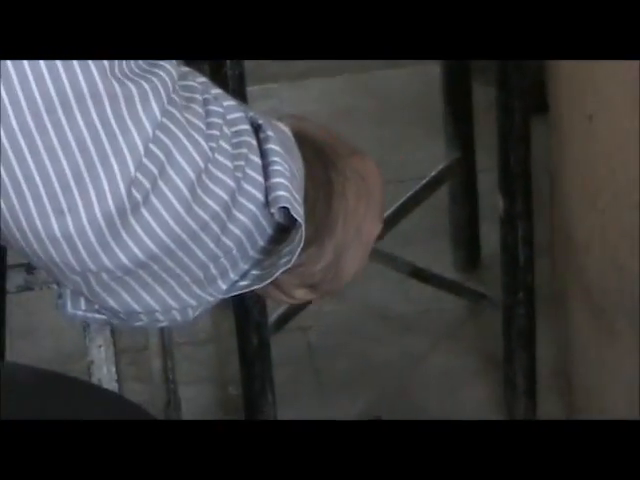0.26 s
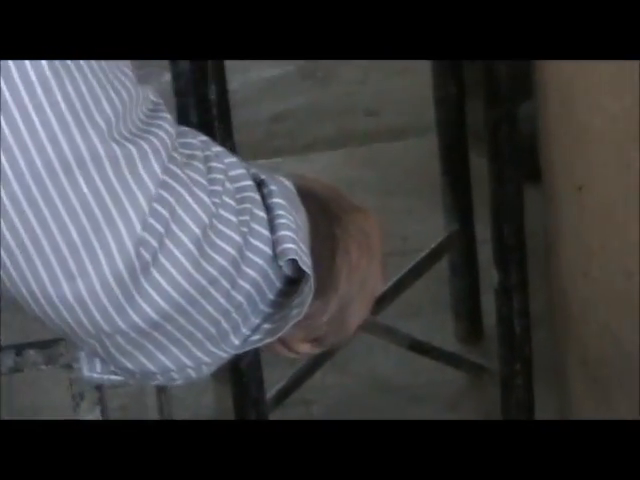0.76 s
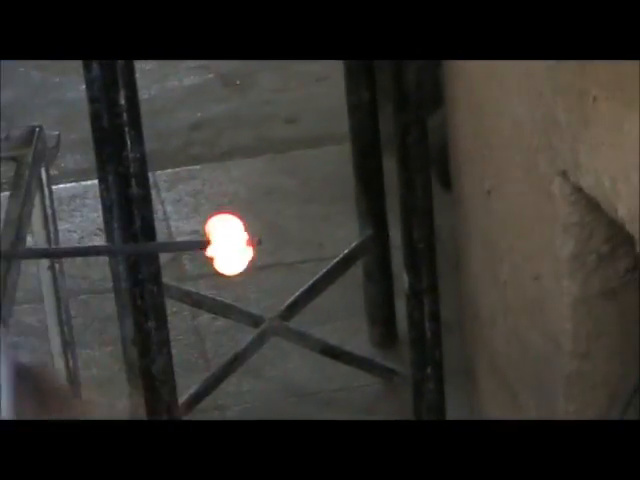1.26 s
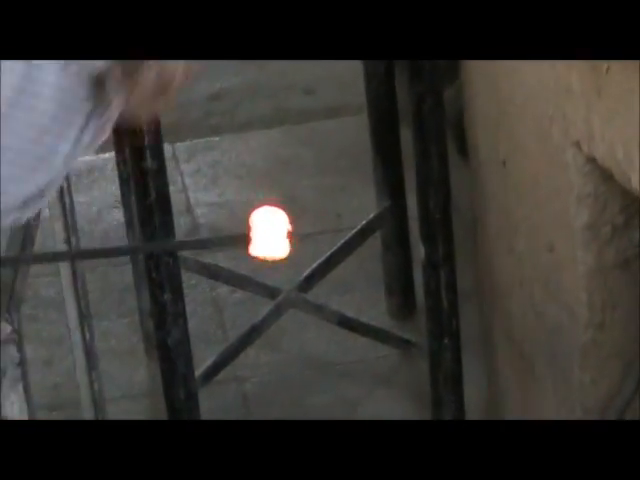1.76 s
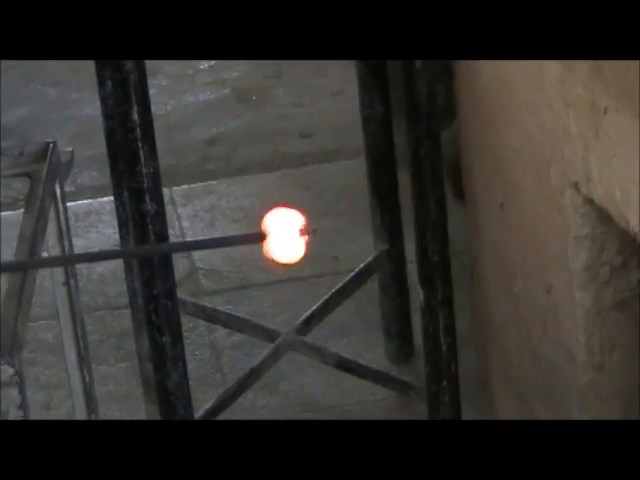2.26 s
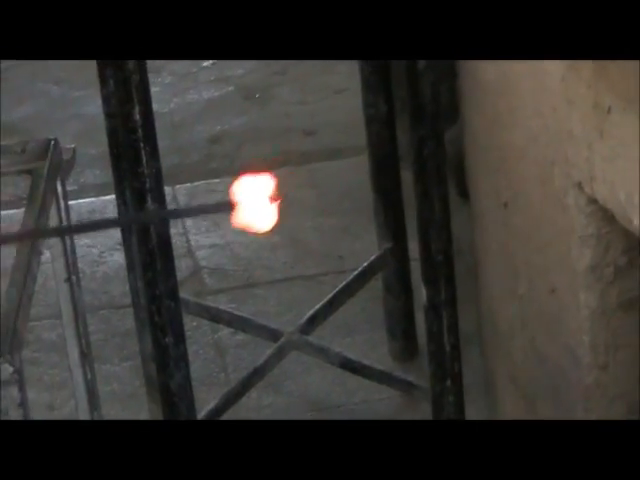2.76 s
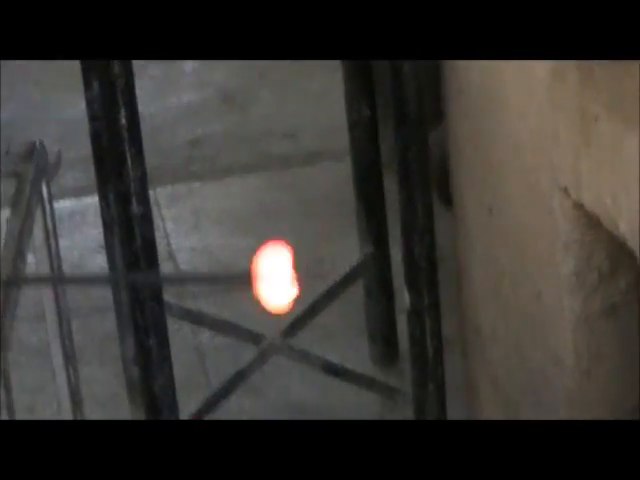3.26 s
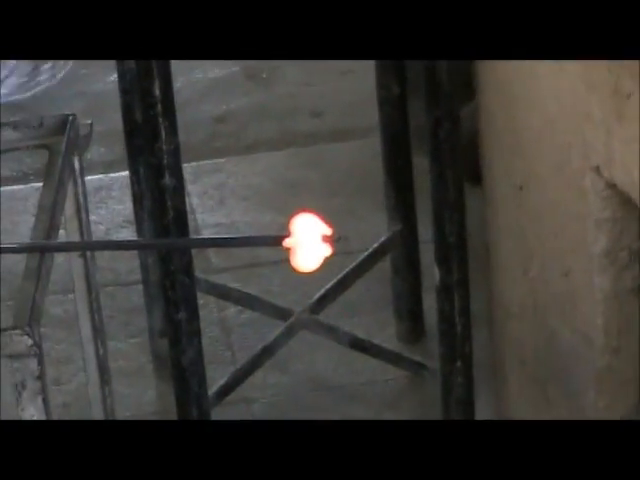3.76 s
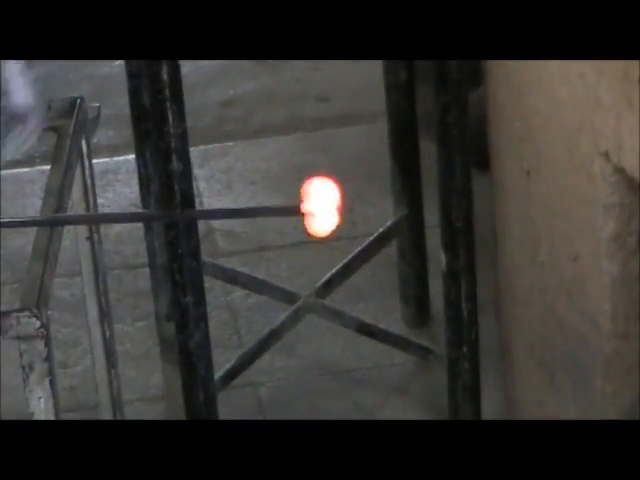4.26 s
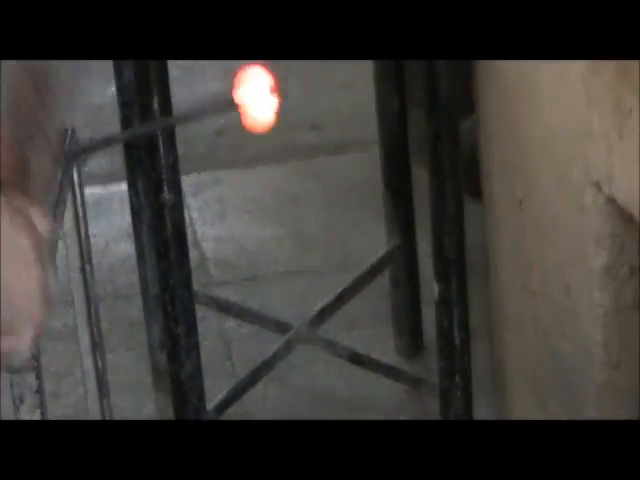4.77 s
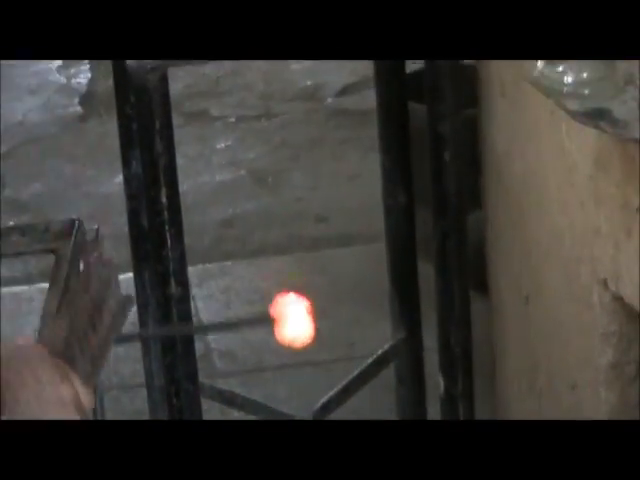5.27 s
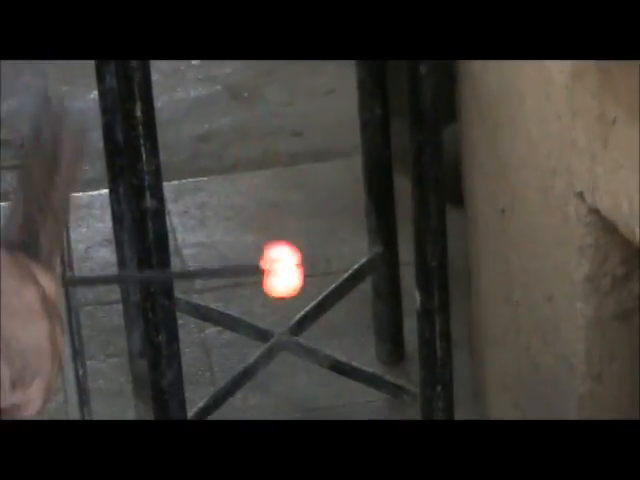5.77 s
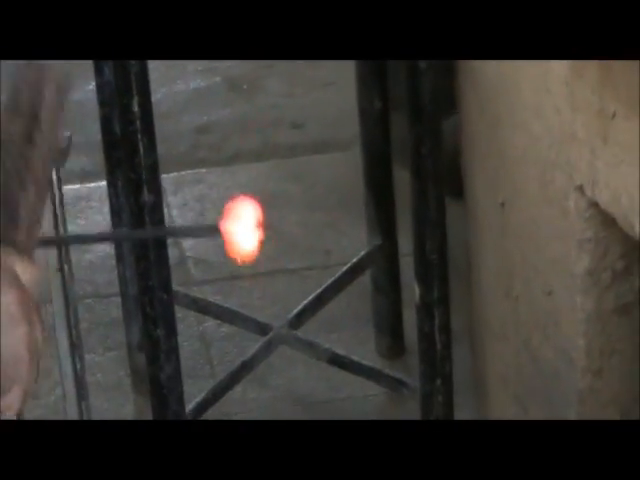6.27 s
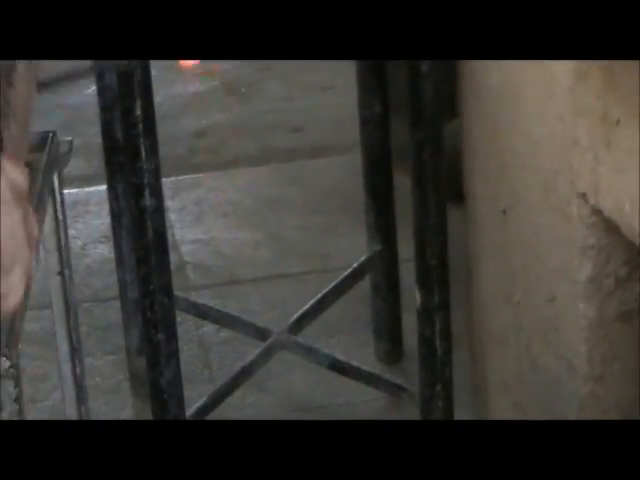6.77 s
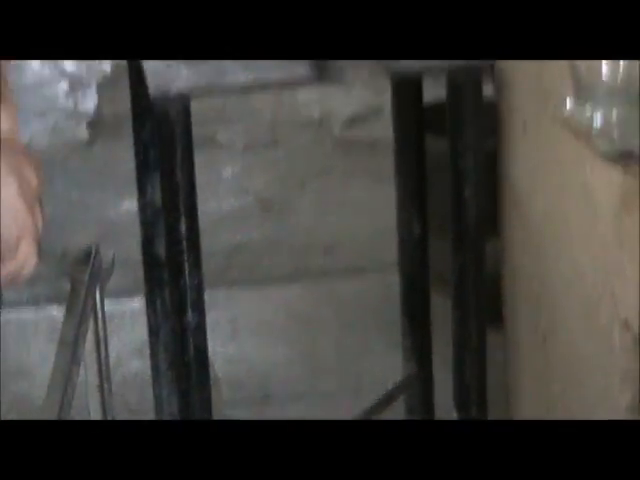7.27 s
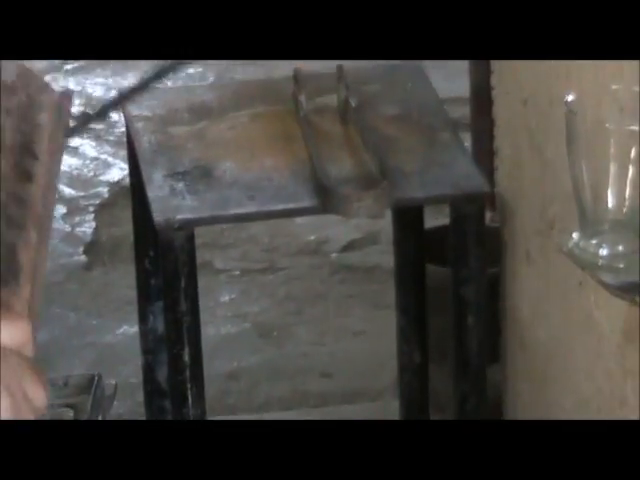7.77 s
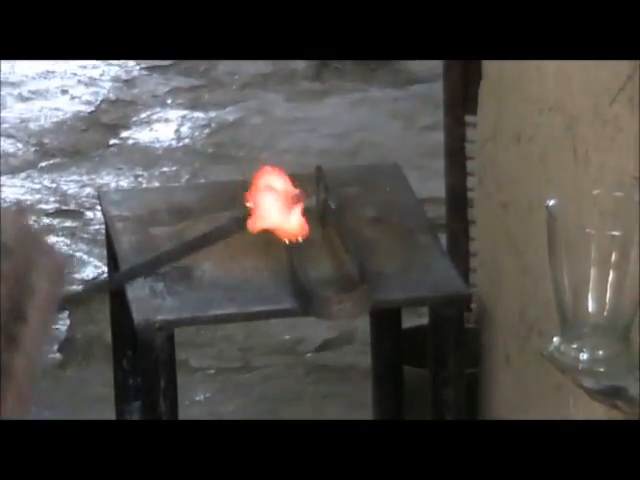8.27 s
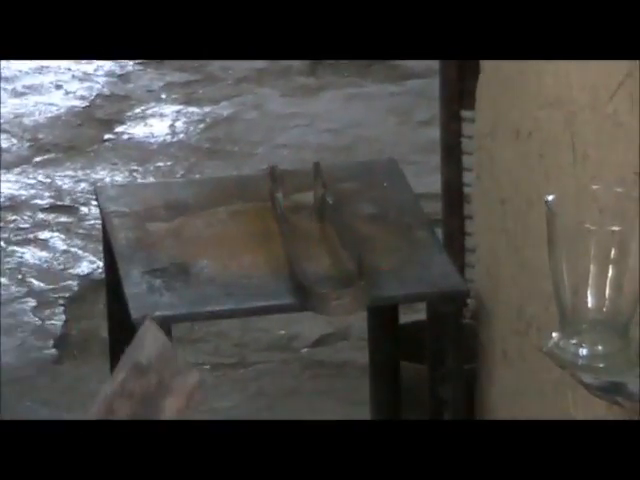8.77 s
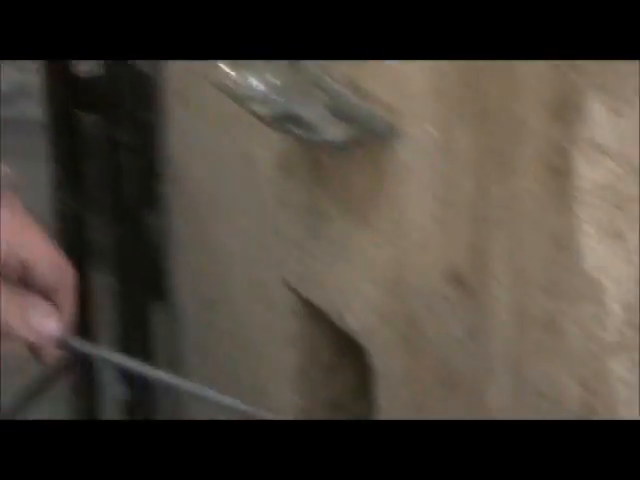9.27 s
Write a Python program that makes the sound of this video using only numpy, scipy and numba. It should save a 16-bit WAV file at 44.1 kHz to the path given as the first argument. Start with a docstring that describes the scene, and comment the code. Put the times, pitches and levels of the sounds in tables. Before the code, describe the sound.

In a hard-walled glass workshop a furnace roars low and steady, with draught puffs thumping the microphone. Far tools clank down at about two and three seconds, shaking an iron bar and a tray. After two faint steel brushes, a nearby steel tool is tapped about five times a second until the later part, clacking and ringing brightly, some early taps followed by grainy skitters. The roar dips under the taps, then returns.

```python
"""A steel tool is tapped close to the microphones in a quick run: clack, shimmer and ringing steel modes.
After some taps it skitters in many tiny contacts; before the run the steel is lightly brushed twice.
Across the hard-walled workshop, tools clank down and shake a tray and an iron bar.
A glass furnace roars throughout, as noise shaped by cavity resonances, and draught puffs buffet the ports.
The recorder's limiter ducks everything after loud peaks, so the roar dips under the taps."""
import sys
import numpy as np
from scipy import signal
from scipy.fft import rfft, irfft, next_fast_len
from scipy.io import wavfile
from numba import njit

SR = 44100
rng = np.random.default_rng(int(sys.argv[2]) if len(sys.argv) > 2 else 0)


def unload_audio(sound):
    """Save the sound as a 16-bit wav file, at the path given as the first command line argument."""
    columns = np.transpose(np.atleast_2d(sound))
    # keep every value between -1 and 1, then stretch to whole-number steps
    steps = np.round(np.clip(columns, -1, 1) * 32767)
    wavfile.write(sys.argv[1], SR, steps.astype(np.int16))


N = 419821
TIME = np.arange(N) / SR
AFTER = np.arange(int(.6 * SR)) / SR  # seconds since a blow

# Draught puffs across the microphone: peak_s, relative level_db, length_s shared by rise and fall
DRAUGHT_PUFFS = [(0.617, -15, 0.089), (0.884, -18.5, 0.45), (2.847, -26, 0.063), (3.138, -10.5, 0.29),
                 (3.528, -14, 0.17), (3.723, -18, 0.09), (4.514, -27, 0.14), (6.625, -10.5, 0.1),
                 (7.942, -6.5, 0.026), (8.246, -25.5, 0.97), (8.636, -13, 0.19), (9.255, -7, 0.075),
                 (9.365, -10, 0.1)]
# Tone of the buffeting at the two ports: pitch_hz, relative level_db
PORT_BUFFETING = [(20, -12.5), (40, -5), (70, 0), (120, 7), (180, 3), (300, 0), (450, -12.5), (700, -21),
                  (1200, -41), (3000, -77)]
# Slow drift of the flame's strength: time_s, relative level_db
FLAME_DRIFT = [(0, 2.5), (1.5, 4), (3.3, 2.5), (4.6, 2), (6.2, 3.5), (7.2, 8.5), (8.3, 2.5), (9.52, 10.5)]
# Resonances of furnace and room: pitch_hz, relative width_hz, relative level_db
FURNACE_RESONANCES = [(47, 22, -30), (101, 11.6, -16), (116, 5.1, -10.5), (144.9, 7.5, 1), (154.8, 6.5, 4),
                      (169.3, 15, 0), (181.1, 10.4, -0.5), (218.5, 33.6, -4.5), (243.6, 16, -15),
                      (253.6, 6.1, -9.5), (265.3, 7.3, -8.5), (287.8, 16.5, -8), (316.6, 30.5, -11.5),
                      (340.7, 21.4, -15), (377, 30, -26), (385.5, 58, -24), (558, 26.4, -26),
                      (670, 100, -28), (706, 23, -23.5), (795, 65, -27), (954, 92, -30), (1129, 61, -27.5)]
# Broad rush of the burner: pitch_hz, level_db per Hz on the scale of the resonances
BURNER_RUSH = [(20, -46), (35, -31.5), (80, -23.5), (300, -38), (480, -31.5), (900, -46), (1350, -35.5),
               (1650, -36), (2200, -42), (3800, -48), (6000, -55.5), (9000, -61.5), (11500, -73.5),
               (15500, -91)]
# Diffuse roar that differs left to right: pitch_hz, level_db per Hz on the same scale
DIFFUSE_ROAR = [(20, -33), (40, -27), (70, -33.5), (120, -41.5), (180, -27.5), (300, -43), (450, -45.5),
                (1000, -43), (2000, -46.5), (4000, -52), (8000, -62), (15000, -73.5)]
# Far tool clanks: start_s, relative level_db, brightness_db per octave, chatter_t60_s,
# bar_share (0-1), tray_share (0-1)
FAR_CLANKS = [(1.716, -21, 2.5, 0.15, 0.06, 0.2), (1.748, -14.5, 0.5, 0.24, 0, 0.5),
              (2.204, -13.5, -1, 0.14, 1, 0), (2.258, -19, -2.5, .08, 0, .1),
              (2.272, -9.5, -2, 0.21, 0.45, 0), (2.876, -21, -1.5, 0.18, 0, 0.4),
              (2.966, -11.5, 6, 0.16, 0, 0.52), (3.023, -18, -3, 0.19, 0, 0.4),
              (3.108, -25.5, -1, 0.45, 0.13, 0.8), (3.16, -25.5, 2, 0.18, 0, 1),
              (3.177, -21, -2.5, 0.21, 0.1, 1), (3.27, -31.5, -6, 0.77, 0.1, 0.85),
              (3.405, -27.5, -3.5, 0.13, 0.05, 0.3)]
# Clatter of a far clank: pitch_hz, relative level_db
CLANK_CLATTER = [(400, -1), (900, -10), (1500, -4.5), (2400, -5.5), (3200, 2.5), (5000, 1.5), (6500, -0.5),
                 (8500, -3.5), (11000, -12.5), (15000, -25.5)]
# Steel tray shaken by the clanks: pitch_hz, relative level_db, t60_s
TRAY_MODES = [(1981, -11, .35), (2918, -13, .45), (3009, -2, .25), (3095, -8, .28), (3418, -6, .35),
              (3833, -12, .9), (4463, -8, 1.1), (4544, -8, 1.1), (4823, -3, .2), (5030, -5, .22),
              (5480, -7, .7), (5900, -7, .2), (6498, -11, .2), (6772, -10, .2), (7355, -8, .22),
              (8096, -9, .2), (9039, -12, .18)]
# Heavy iron bar: pitch_hz, relative level_db, t60_s
BAR_MODES = [(828, 0, .35), (1491, -8, .3), (2386, 8.5, .33), (2432, 0, .18), (2590, -4, .25),
             (2713, -9, .3), (2870, -8, .35), (3343, -4, .5), (3680, -5, .15), (3752, -3, .3),
             (3853, -9, .3), (4014, 1, .5), (4310, -4, .12), (4683, -5, .33), (4860, -5, .2),
             (5211, -2, .3), (5523, -9, .42), (6140, -9, .2), (6370, -3, .48), (7020, -5, .36),
             (7860, -11, .7), (8014, -7, .28), (8769, -8, .3), (9076, -9, .3), (9238, -12, .3)]
# Light brushes of the near steel: peak_s, relative level_db, swell_length_s
STEEL_BRUSHES = [(3.715, -28.5, .04), (4.125, -31.5, .04)]
# Skitters just after some taps: start_s, relative level_db, brightness_db per octave, chatter_t60_s
TOOL_REBOUNDS = [(5.319, -14, 1, .15), (5.529, -13, -1, 0.2), (5.758, -12.5, 2.5, 0.089),
                 (5.961, -12.5, -.5, 0.12), (6.174, -7.5, 1.5, 0.15), (6.377, -6, .5, 0.14)]
# Grain of the skitter: pitch_hz, relative level_db
SKITTER_GRAIN = [(500, -1), (1100, -11), (1500, -1.5), (2400, -5), (3300, 0), (4300, -1.5), (5200, 1),
                 (6700, -1.5), (8500, -4), (11000, -10.5), (15000, -26)]
# What rings during the skitter: pitch_hz, relative level_db, t60_s
SKITTER_RINGS = [(1981, -8, .3), (3095, -7, .25), (3418, -5, .35), (4020, -7, .2), (4490, -4, .2),
                 (5030, 0, .2), (7355, -4, .2), (8500, -10, .15)]
# Near taps: start_s, relative level_db, hardness_db per octave, then level_db of the five main rings,
# lowest first, which depend on where the blow lands
NEAR_TAPS = [(4.8259, -5, -6.5, -5, -5.5, -1, 6, -9), (5.034, 2, -3, -3, -22, -6, -6, -0.5),
             (5.264, 1, -3.5, 0, -8, -19, -10, 8), (5.4799, 4, -1, -1, -1, -14, -1, -0.5),
             (5.6848, 5, -4, -1, -11, -16, -2, -3), (5.9132, 1.5, 3, -5, -3, -6, 2, 4.5),
             (6.126, 2.5, 1, -9, 2.5, -1, 12, 2), (6.335, 5.5, -0.5, -5, -3, 0, 3, -2),
             (6.535, 7, -3, -9, -2.5, 0, 2, -7), (6.783, -1.5, -4, 3.5, -1, 3.5, 8, 10.5),
             (6.9784, 2, -8, 6, -1, -1, -8, 4.5), (7.14, 4.5, -2, 5, -11, -2, -4, 3.5),
             (7.3053, 0, -1.5, 2, -18, 5.5, 15.5, -10), (7.4412, 1, -2, 2, -8, 3, 6.5, 0.5),
             (7.6099, -0.5, -5, 3.5, 3.5, 2, 3, -0.5), (7.7692, 2.5, -3, 1, 4.5, 0, 4, 3.5),
             (7.9447, 1, -2, 1, 4, -18, 2, 3.5), (8.1198, -1.5, -3.5, -3, -11, -8, -9, -1),
             (8.2968, -1, 0, 0, 5, 7, -7, 2.5), (8.4819, 2.5, -2, 6.5, -2, 2.5, -11, -3),
             (8.6416, 5.5, -2, 3, -10, 5, 2, 4.5)]
# The tapped steel, before the hand damps it: pitch_hz, relative level_db, t60_s
STEEL_MODES = [(1650, -28, .06), (2412, -25, .2), (3677, -16.5, .3), (3901, -12.5, .38), (4235, -13, .15),
               (4285, -12, .13), (4961, -2.5, .3), (5030, -16, .2), (5211, -16, .28), (5560, -14, .08),
               (6600, -18, .26), (6836, -9.5, .25), (8402, -12, .25), (8657, -8, .14), (8850, -11, .07),
               (10320, -17, .45), (10342, -9.5, .48), (10660, -20, .2), (10965, -11, .14),
               (11585, -17, .19), (12948, -22, .22), (13450, -25, .14), (13900, -22, .07),
               (14620, -26, .12)]
# Short clack of the contact: pitch_hz, relative level_db
CONTACT_CLACK = [(800, -25), (1600, 1), (2900, -3.5), (4200, 14), (5300, 7), (6300, 1.5), (6850, -10),
                 (7400, 3.5), (8600, 2.5), (9600, -1.5), (10900, -3.5), (12300, -3), (13200, -7),
                 (15500, -17)]
# Many weak, close modes of both tools, heard as rough shimmer: pitch_hz, relative level_db
STEEL_SHIMMER = [(1500, -10), (3200, -8.5), (4300, -8), (5500, 3.5), (7400, -1), (8500, -1.5), (9500, -6),
                 (10800, -5), (13300, -29), (15500, -37)]
# The steel's low modes fade as the run goes on: time_s, relative level_db
LOW_RING_DRIFT = [(4.8, 11), (5.3, 2), (6.8, 2), (7, -4)]
# Main rings, each one mode or a close pair: pitch_hz
MAIN_RING_CENTRES = [3790, 4961, 6836, 8402, 10335]

MAIN_RING_REACH_HZ, LOW_RINGS_BELOW_HZ = 130, 3000
GUST_RISE_SHARE, STILL_AIR_DB = 0.51, -38.5  # part of a puff spent rising; draught between puffs
TRAY_DB, BAR_DB = -13, -12.5  # ring level against the clank
BAR_DETUNE, BAR_SCATTER_DB = .0004, 1.5  # the bar lies still and nearly keeps its pitch
SKITTER_RING_DB = -14  # clinks against scrape
GRIP_DAMPING, GRIP_DAMPING_SPREAD = 1.43, .15  # the hand shortens the rings; spread from tap to tap
GRIP_DETUNE, GRIP_WAVER_RAD = .0009, .32  # pitch share shifted at each tap; phase waver
MINOR_SCATTER_DB = 3.5  # change of the minor modes from tap to tap
CONTACT_HZ = 4000  # modes below this are driven alike by soft and hard blows
SPREAD_HZ = 5000  # frequency at which the phase spread between microphones is given
TOP_HZ = 15700  # upper edge of the recorder's passband


def undb(db):
    """Decibels to gain."""
    return 10 ** (np.asarray(db) / 20)


def unit(x):
    """Scale to rms 1."""
    return x / np.sqrt(np.mean(x ** 2))


def colour(points, hz):
    """Gain at each frequency, interpolated in dB over log frequency."""
    point_hz, db = np.transpose(points)
    return undb(np.interp(np.log(hz + 1), np.log(point_hz), db))


def bins(size):
    """Frequencies of the spectrum of a sound of this size."""
    return np.arange(size // 2 + 1) * SR / size


def wander(rate, size):
    """Smooth chance with a spread near 1, taking a new direction rate times a second."""
    return 1.2 * np.interp(np.arange(size) * rate / SR, np.arange(4096), rng.standard_normal(4096))


def tinted(points, size, bright_db=0, patchy_db=0):
    """Coloured noise of rms 1, tilted about 4 kHz; patches stand for many small, close resonances."""
    hz = bins(size)
    tilt_db = bright_db * np.log2((hz + 500) / 4500)
    patches_db = patchy_db * np.interp(hz, np.linspace(0, SR / 2, 400), rng.standard_normal(400))
    spectrum = rfft(rng.standard_normal(size)) * colour(points, hz)
    return unit(irfft(spectrum * undb(tilt_db + patches_db), size))


def stereo(mid, side):
    """Left and right from mid and side."""
    return np.array([mid + side, mid - side])


def fade(t60):
    """Exponential decay after a blow, by 60 dB in t60 seconds."""
    return np.exp(-np.log(1000) * AFTER / max(t60, .002))


def add(out, s, sound):
    """Mix a sound in at a time in seconds."""
    start = int(s * SR)
    out[:, start:start + sound.shape[1]] += sound[:, :N - start]


def ring(modes, weight_db, spread, detune=0.0013, waver=0.19, waver_rate=70):
    """Decaying modes, detuned and wavering in phase, each with its own phase at the two microphones."""
    out = 0
    for (hz, db, t60), extra_db in zip(modes, weight_db):
        mic_phase = spread * hz / SPREAD_HZ * rng.standard_normal((2, 1))
        phase = rng.uniform(0, 2 * np.pi) + mic_phase
        pitch_hz = hz * (1 + detune * rng.standard_normal())
        wave = 2 * np.pi * pitch_hz * AFTER + waver * wander(waver_rate, len(AFTER))
        out = out + undb(db + extra_db) * fade(t60) * np.sin((wave + phase).astype(np.float32))
    return out


def blow_db(hz, hardness_db):
    """A hard blow favours the high modes."""
    return hardness_db * np.log2(np.maximum(hz, CONTACT_HZ) / CONTACT_HZ)


def grit(points, bright_db, side, side_bright_db=3):
    """Stereo noise of many small, close resonances, different at every blow and wider in the treble."""
    mid = tinted(points, len(AFTER), bright_db, patchy_db=3)
    apart = tinted(points, len(AFTER), bright_db + side_bright_db, patchy_db=3)
    return stereo(mid, side * apart)


def chatter(rate, t60, bounce_db, spread_db):
    """One contact followed by irregular, dying bounces, with total energy 1."""
    hits = rng.random(len(AFTER)) < rate / SR
    scatter_db = spread_db * np.clip(rng.standard_normal(len(AFTER)), -2, 2)
    bounces = hits * undb(bounce_db + scatter_db) * fade(t60)
    bounces[0] = 1
    return bounces / np.sqrt(np.sum(bounces ** 2))


def rattle(points, bright_db, side, contacts, crack_t60, tail_db, tail_t60):
    """Every contact adds the energy of a short crack and a weak tail, which shapes gritty noise."""
    decay = fade(crack_t60) + undb(tail_db) * fade(tail_t60)
    energy = signal.fftconvolve(contacts ** 2, decay ** 2)[:len(AFTER)]
    return grit(points, bright_db, side) * np.sqrt(np.abs(energy))


def workshop(x, wet_db, t60, treble_t60, side_db):
    """Dense reflections from hard walls; the treble dies first."""
    noise = rng.standard_normal((2, len(AFTER)))
    low = signal.sosfilt(signal.butter(2, 6000, fs=SR, output="sos"), noise)
    high = signal.sosfilt(signal.butter(2, 6000, "high", fs=SR, output="sos"), noise)
    build_up = 1 - np.exp(-AFTER / 0.0042)
    tail = (low * fade(t60) + high * fade(treble_t60)) * build_up
    tail /= np.sqrt(np.sum(tail[0] ** 2))
    walls = stereo(tail[0], undb(side_db) * tail[1])
    return x + undb(wet_db) * signal.fftconvolve(x.mean(0)[None], walls, axes=1)[:, :N]


def draught(level_db=-1, buffet_db=-3.0, buffet_rate=22, common=0.42):
    """Puffs of moving air swell, die away and push the two ports mostly in opposite senses."""
    air = undb(STILL_AIR_DB)
    for s, db, length in DRAUGHT_PUFFS:
        width = length * np.where(TIME < s, GUST_RISE_SHARE, 1 - GUST_RISE_SHARE)
        air = air + undb(db) * np.exp(-((TIME - s) / width) ** 2)
    size = next_fast_len(N, real=True)
    push = stereo(common * tinted(PORT_BUFFETING, size), tinted(PORT_BUFFETING, size))[:, :N]
    return air * undb(level_db + buffet_db * wander(buffet_rate, N)) * push


def furnace(level_db=-13, flutter_db=0.91, balance_db=-1.5):
    """Turbulent burning drives the cavity resonances; the gas rushes above them and all flutters a little."""
    size = next_fast_len(N, real=True)
    hz = bins(size)
    power = colour(BURNER_RUSH, hz) ** 2
    for f, width, db in FURNACE_RESONANCES:
        # a rounded peak with steep skirts
        power = power + undb(2 * db) / (1 + ((hz - f) / (1.29 * width)) ** 2) ** 4.25
    mid, side = rfft(rng.standard_normal((2, size)))
    spectrum = stereo(mid * np.sqrt(power), side * colour(DIFFUSE_ROAR, hz))
    roar = unit(irfft(spectrum, size)[:, :N])
    flame_db = level_db + np.interp(TIME, *np.transpose(FLAME_DRIFT)) + flutter_db * wander(25, N)
    return roar * undb(flame_db + np.array([[balance_db], [-balance_db]]) / 2)


def clanks(level_db=6):
    """A far tool chatters to rest and may set tray and bar ringing, with strong echoes from the room."""
    out = np.zeros((2, N))
    for s, db, bright_db, chatter_t60, bar_share, tray_share in FAR_CLANKS:
        contacts = chatter(rate=170, t60=chatter_t60, bounce_db=-2, spread_db=5)
        clatter = rattle(CLANK_CLATTER, bright_db, 0.24, contacts,
                         crack_t60=0.045, tail_db=-15, tail_t60=0.31)
        tray_db = 2 * rng.standard_normal(len(TRAY_MODES))
        tray = tray_share * undb(TRAY_DB) * ring(TRAY_MODES, tray_db, spread=0.42, waver=0.38)
        bar_db = BAR_SCATTER_DB * rng.standard_normal(len(BAR_MODES))
        bar = ring(BAR_MODES, bar_db, spread=0.22, detune=BAR_DETUNE, waver=0.46)
        bar = bar_share * undb(BAR_DB) * bar
        restrikes = chatter(rate=120, t60=chatter_t60, bounce_db=-9, spread_db=3)
        rings = signal.fftconvolve(tray + bar, restrikes[None], axes=1)[:, :len(AFTER)]
        add(out, s, undb(db + level_db) * (clatter + rings))
    return workshop(out, wet_db=-7.5, t60=0.34, treble_t60=0.16, side_db=-5.5)


def brushes(scrape_db=-11, bright_db=-6, flicker_db=2):
    """The near steel, grazed lightly, scrapes and swells unevenly into a ringing tinkle without a clack."""
    out = np.zeros((2, N))
    weight_db = blow_db(np.array(STEEL_MODES)[:, 0], bright_db)
    for s, db, length in STEEL_BRUSHES:
        swell = np.exp(-(AFTER / length - 1) ** 2)
        # the modes keep ringing after the swell has peaked
        tinkle = ring(STEEL_MODES, weight_db, spread=0.7) * np.maximum.accumulate(swell)
        scrape = undb(scrape_db) * tinted(CONTACT_CLACK, len(AFTER), bright_db, patchy_db=5) * swell
        level = undb(db + flicker_db * wander(120, len(AFTER)))
        add(out, s - length, level * (1 - fade(length)) * (tinkle + scrape))
    return out


def rebounds(level_db=6):
    """The tool drops back and skitters in many small contacts: a grainy scrape, and a clink at each."""
    out = np.zeros((2, N))
    for s, db, bright_db, chatter_t60 in TOOL_REBOUNDS:
        contacts = chatter(rate=280, t60=chatter_t60, bounce_db=-1, spread_db=6)
        scrape = rattle(SKITTER_GRAIN, bright_db, 0.25, contacts,
                        crack_t60=0.028, tail_db=-15, tail_t60=0.25)
        scatter_db = 2 * rng.standard_normal(len(SKITTER_RINGS))
        rings = ring(SKITTER_RINGS, scatter_db, spread=0.4, waver=0.4)
        clinks = signal.fftconvolve(rings, contacts[None], axes=1)[:, :len(AFTER)]
        add(out, s, undb(db + level_db) * (scrape + undb(SKITTER_RING_DB) * clinks))
    return workshop(out, wet_db=-8, t60=0.33, treble_t60=0.2, side_db=-6.5)


def taps(ring_db=-6.5, clack_db=-5, clack_side=0.32, clack_bright_db=7.0, bite=0.35, bite_t60=0.021,
         shimmer_db=-20, shimmer_t60=0.31, shimmer_side=0.54):
    """Steel on steel: a hard clack, a rough shimmer and strong modes, a different ring leading each blow."""
    out = np.zeros((2, N))
    mode_hz = np.array(STEEL_MODES)[:, 0]
    belongs = np.abs(mode_hz[:, None] - np.array(MAIN_RING_CENTRES)) < MAIN_RING_REACH_HZ
    touch, rise = fade(.036), 1 - fade(.003)
    for s, db, hardness_db, *rings_db in NEAR_TAPS:
        grip = GRIP_DAMPING * np.exp(GRIP_DAMPING_SPREAD * rng.standard_normal())
        held = [(hz, mode_db, t60 / grip) for hz, mode_db, t60 in STEEL_MODES]
        minor_db = blow_db(mode_hz, hardness_db) + MINOR_SCATTER_DB * rng.standard_normal(len(held))
        low_db = np.interp(s, *np.transpose(LOW_RING_DRIFT)) * (mode_hz < LOW_RINGS_BELOW_HZ)
        weight_db = np.where(belongs.any(1), belongs @ np.array(rings_db), minor_db + low_db)
        clack = grit(CONTACT_CLACK, clack_bright_db + hardness_db, clack_side) * touch
        shimmer = grit(STEEL_SHIMMER, hardness_db / 2, shimmer_side) * fade(shimmer_t60)
        tool = ring(held, weight_db, spread=0.31, detune=GRIP_DETUNE, waver=GRIP_WAVER_RAD)
        # the modes start stronger and lose energy quickly while the two pieces still touch
        tool = tool * (1 + bite * fade(bite_t60))
        blow = undb(ring_db) * tool + undb(clack_db) * clack + undb(shimmer_db) * shimmer
        add(out, s, undb(db) * rise * blow)
    return workshop(out, wet_db=-9.5, t60=0.37, treble_t60=0.21, side_db=-3.5)


def scene():
    """Draught and fire, far clanks, then the near steel: brushes, rebounds and taps."""
    return draught() + furnace() + clanks() + brushes() + rebounds() + taps()


@njit
def follow(x, attack, release):
    """Peak follower with a quick rise and a slow fall."""
    out, e = np.empty(len(x)), 0.
    for i in range(len(x)):
        e += (x[i] - e) * (attack if x[i] > e else release)
        out[i] = e
    return out


def record(dry, threshold_db=-4.0, attack_s=0.00045, release_s=0.29):
    """The limiter sees sharp peaks coming and pulls everything down after them; the top is cut."""
    ahead = np.roll(np.abs(dry).max(0), -30)  # look-ahead in samples
    peak = follow(ahead, 1 / (attack_s * SR), 1 / (release_s * SR))
    fade_in = np.minimum(TIME / .003, 1)
    limited = fade_in * np.clip(dry / np.maximum(1, peak / undb(threshold_db)), -1, 1)
    return signal.sosfilt(signal.ellip(10, .2, 80, TOP_HZ, fs=SR, output="sos"), limited)


dry = scene()
out = record(dry)
unload_audio(out)
```